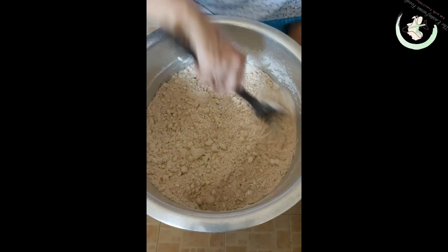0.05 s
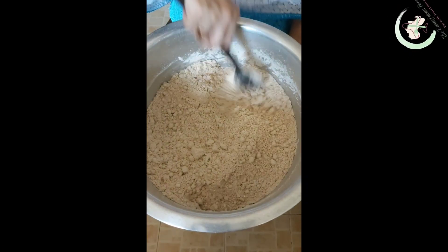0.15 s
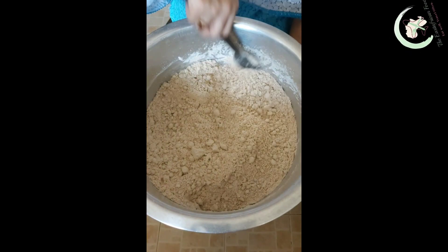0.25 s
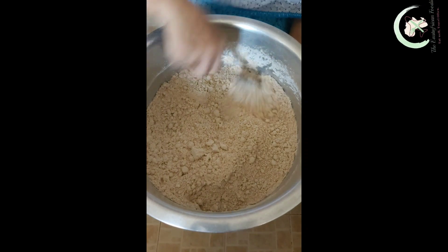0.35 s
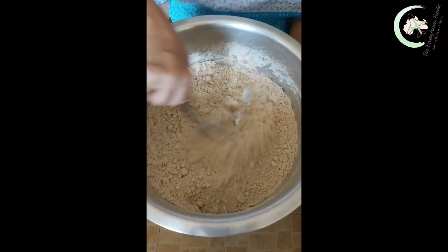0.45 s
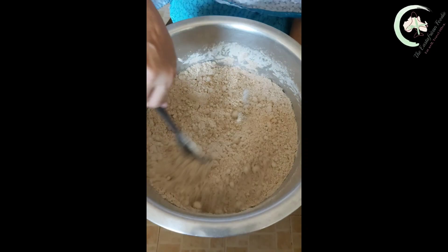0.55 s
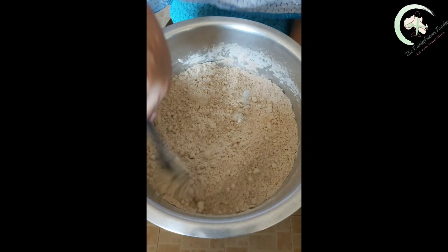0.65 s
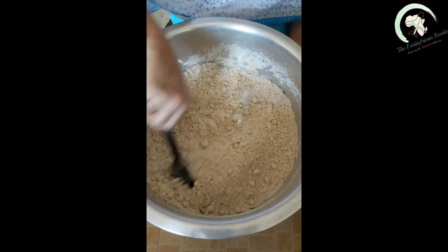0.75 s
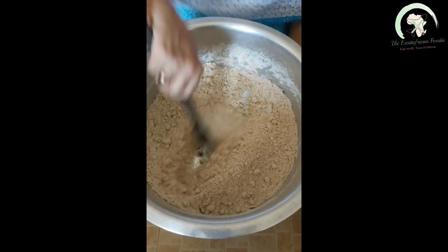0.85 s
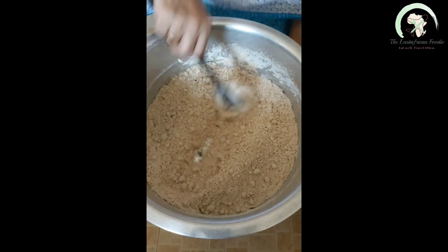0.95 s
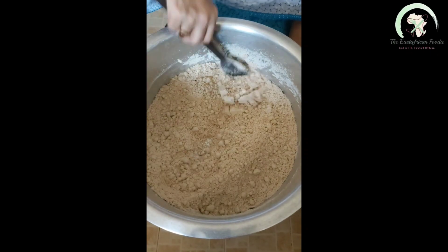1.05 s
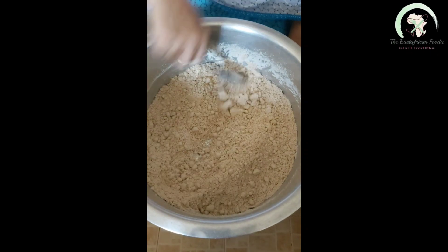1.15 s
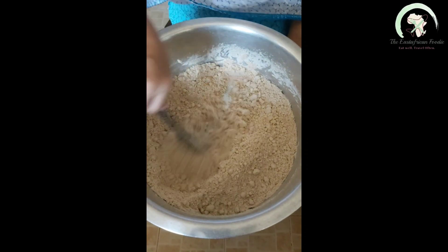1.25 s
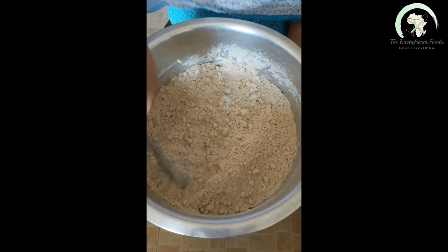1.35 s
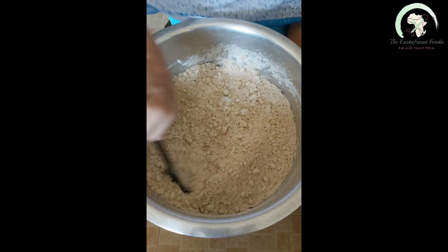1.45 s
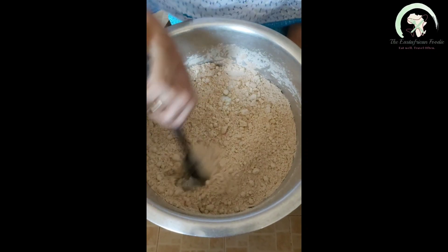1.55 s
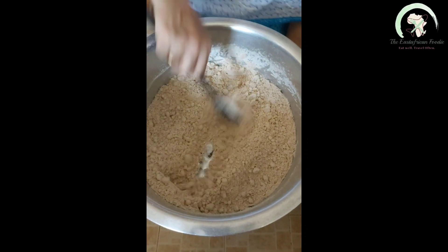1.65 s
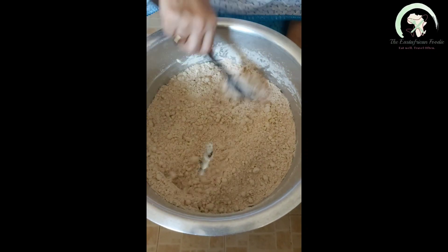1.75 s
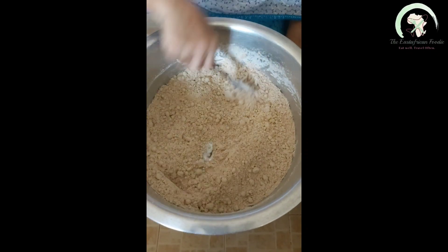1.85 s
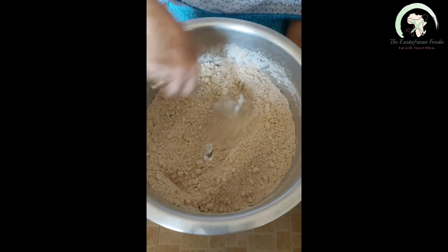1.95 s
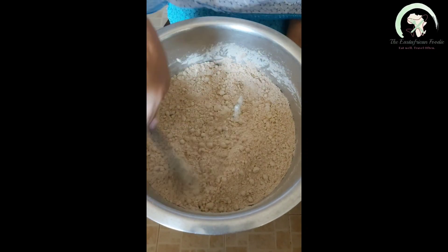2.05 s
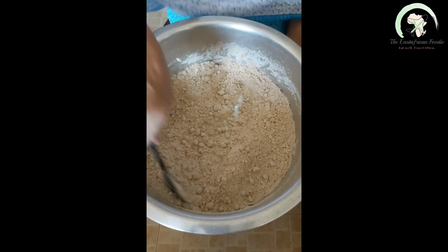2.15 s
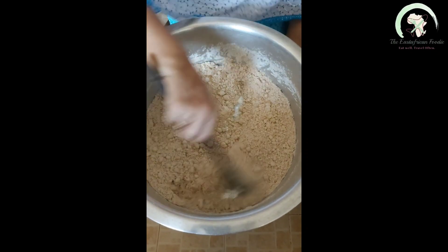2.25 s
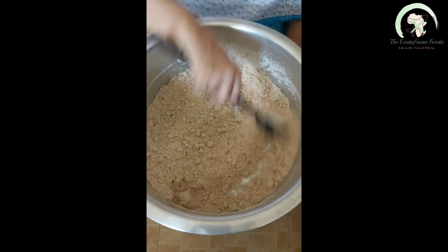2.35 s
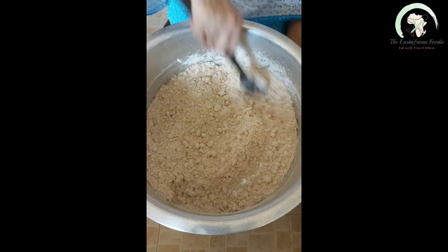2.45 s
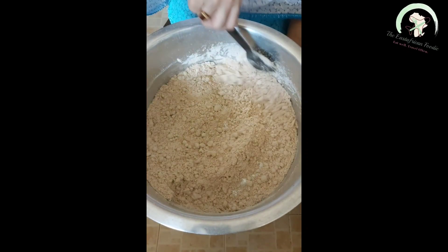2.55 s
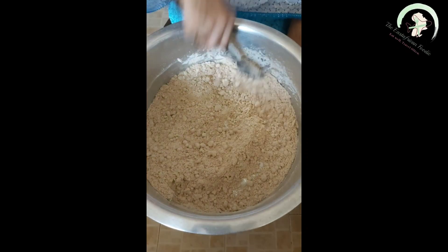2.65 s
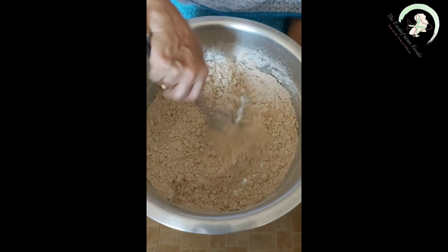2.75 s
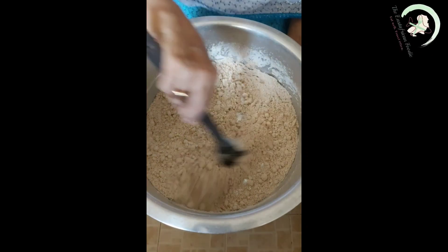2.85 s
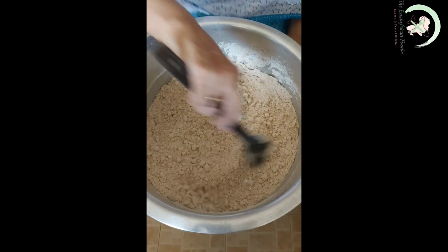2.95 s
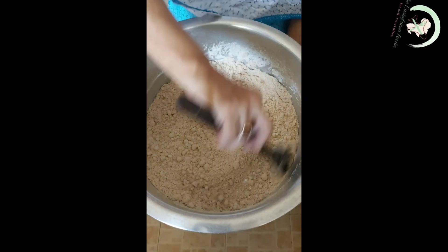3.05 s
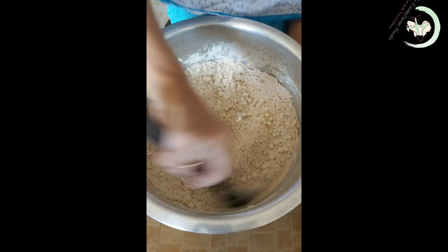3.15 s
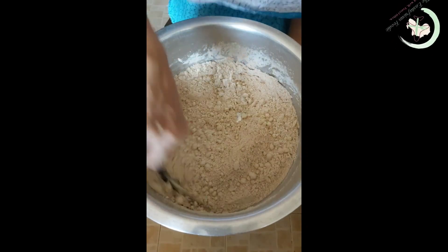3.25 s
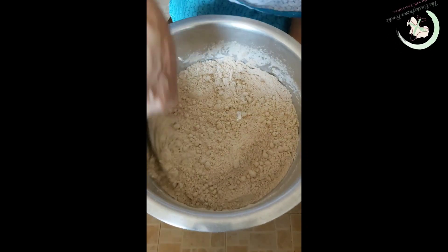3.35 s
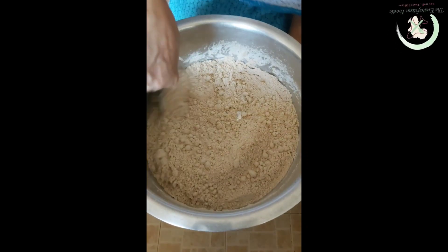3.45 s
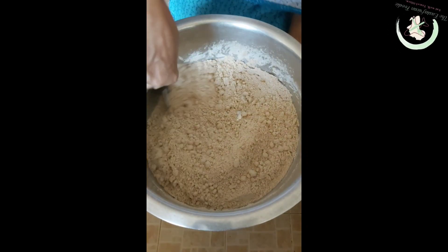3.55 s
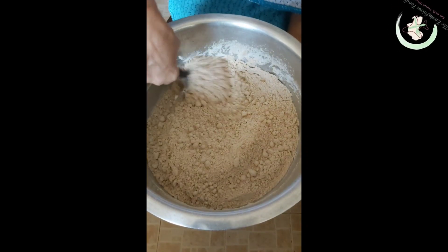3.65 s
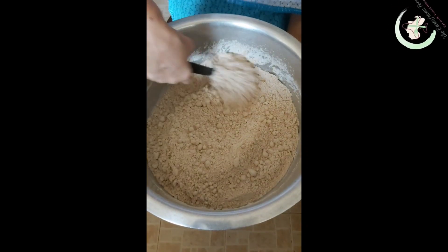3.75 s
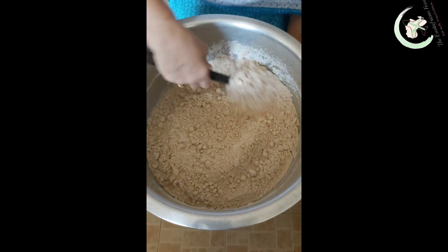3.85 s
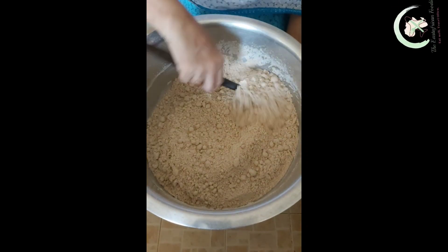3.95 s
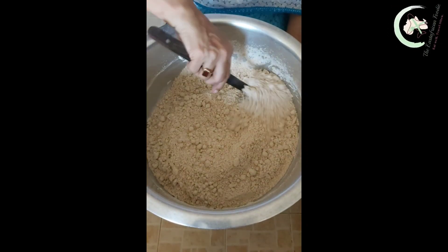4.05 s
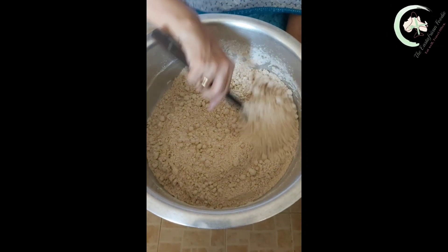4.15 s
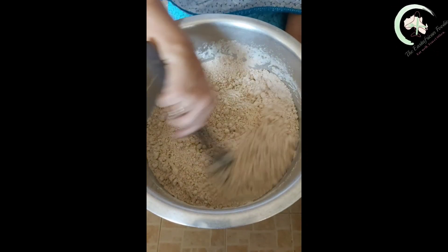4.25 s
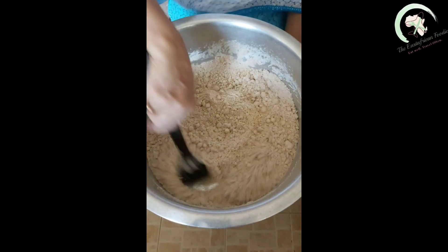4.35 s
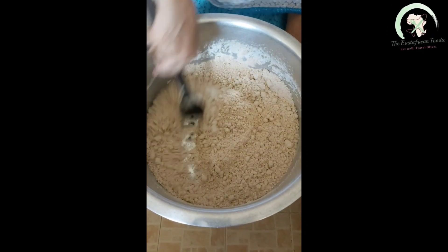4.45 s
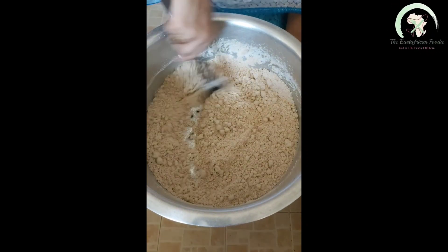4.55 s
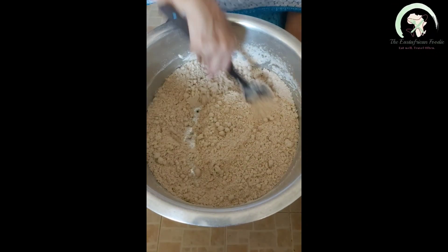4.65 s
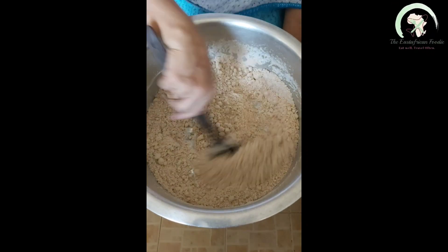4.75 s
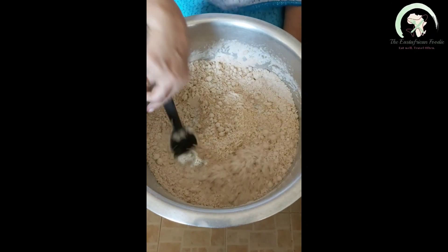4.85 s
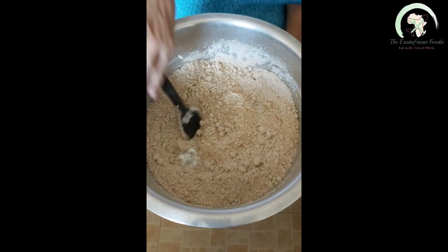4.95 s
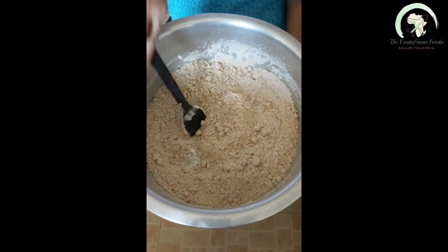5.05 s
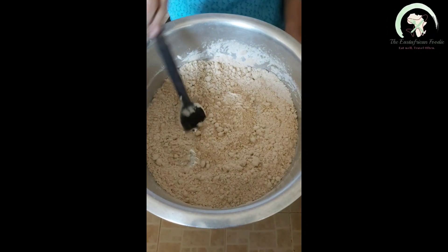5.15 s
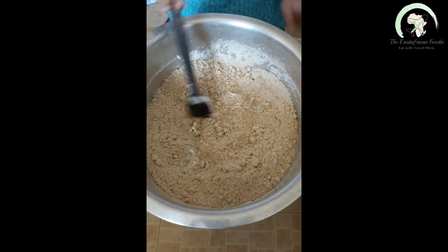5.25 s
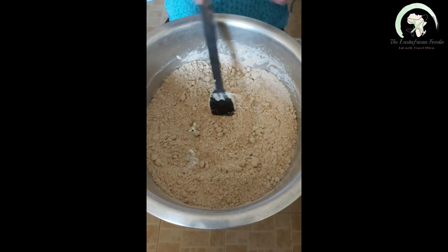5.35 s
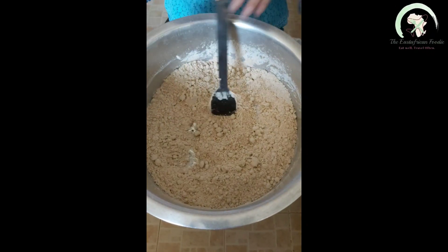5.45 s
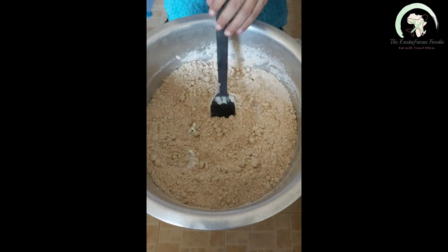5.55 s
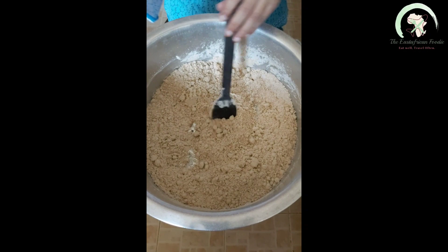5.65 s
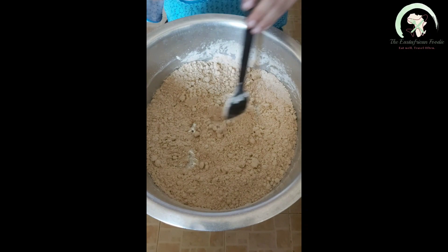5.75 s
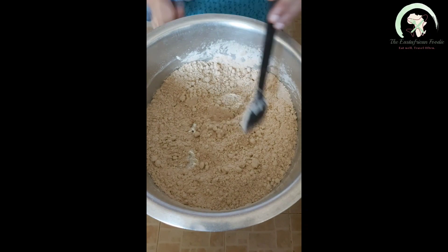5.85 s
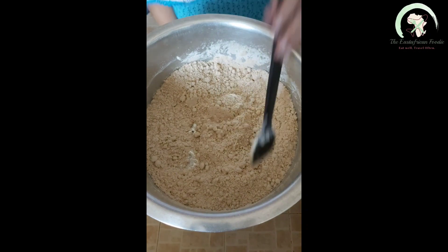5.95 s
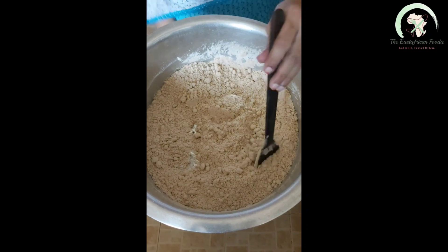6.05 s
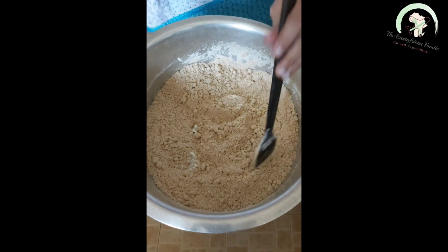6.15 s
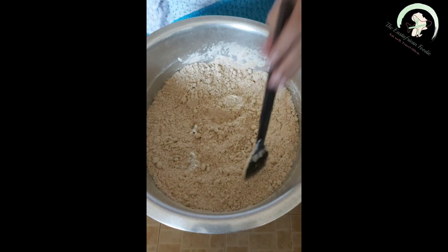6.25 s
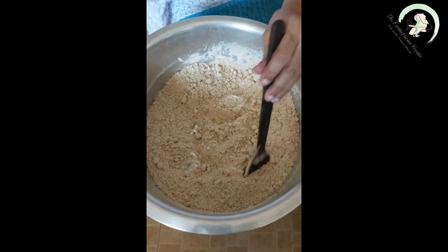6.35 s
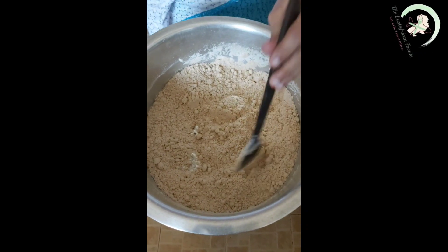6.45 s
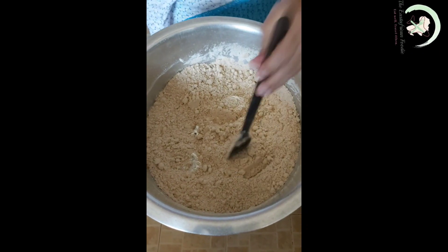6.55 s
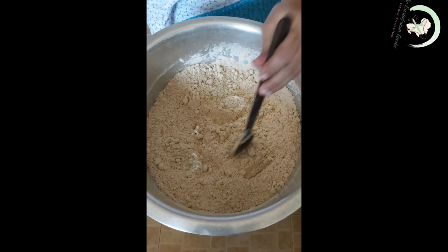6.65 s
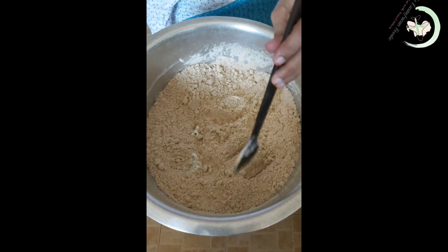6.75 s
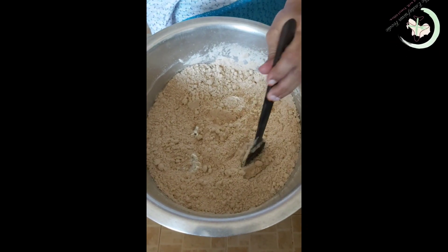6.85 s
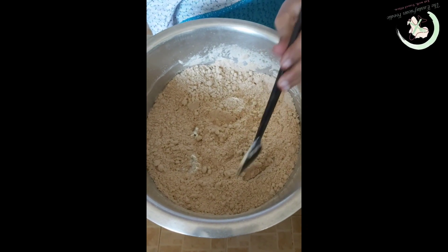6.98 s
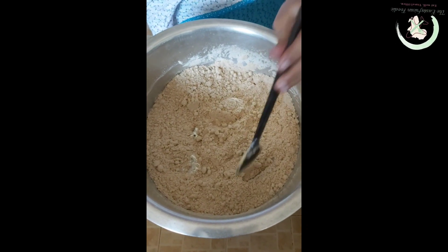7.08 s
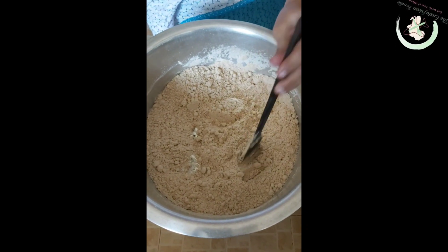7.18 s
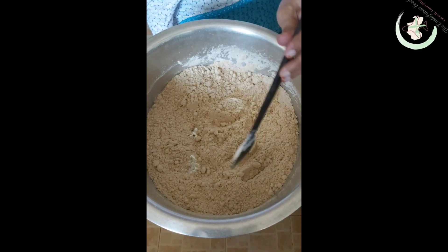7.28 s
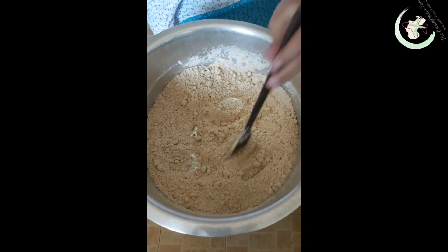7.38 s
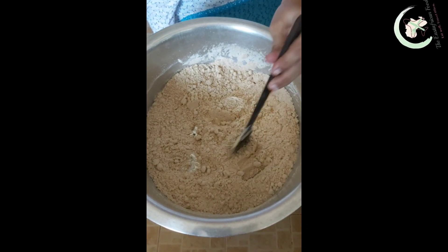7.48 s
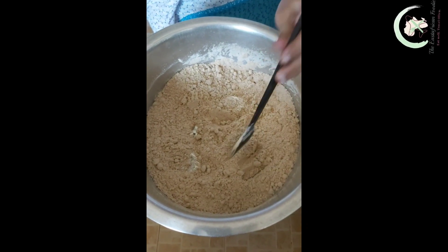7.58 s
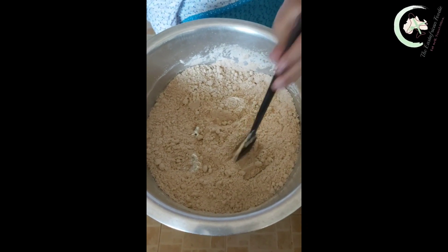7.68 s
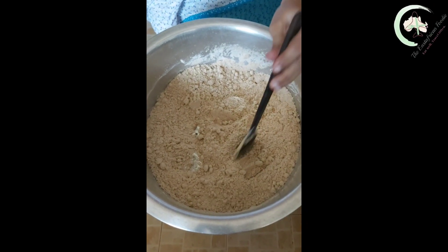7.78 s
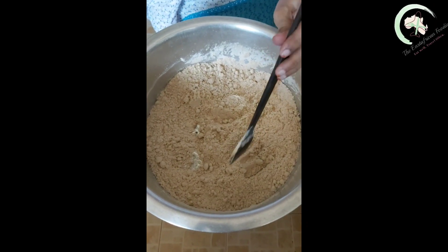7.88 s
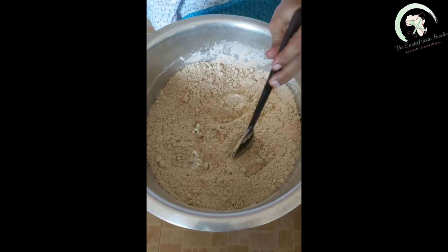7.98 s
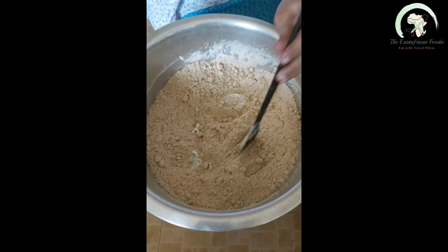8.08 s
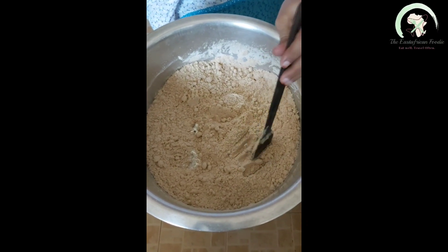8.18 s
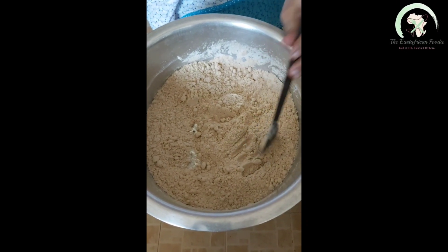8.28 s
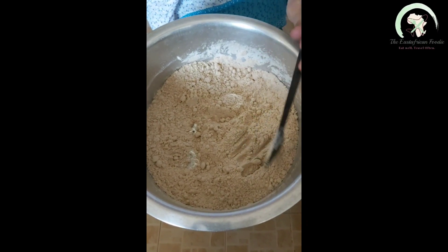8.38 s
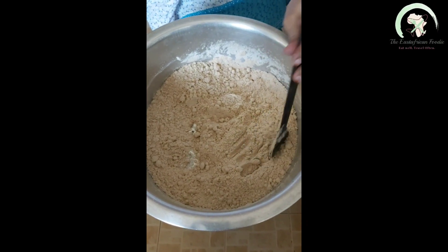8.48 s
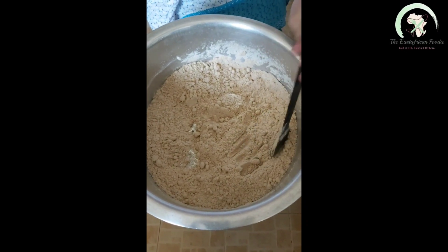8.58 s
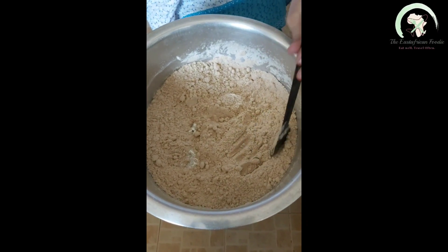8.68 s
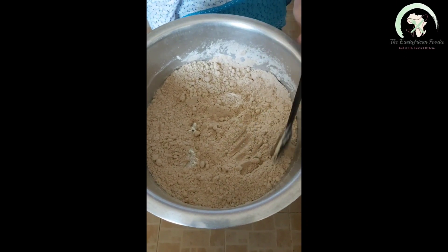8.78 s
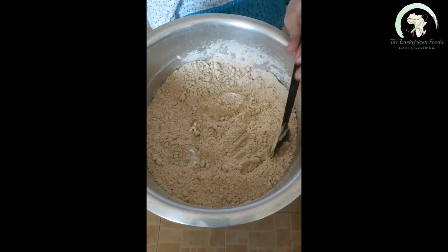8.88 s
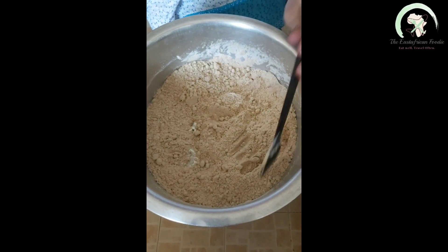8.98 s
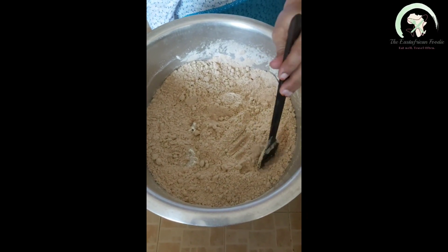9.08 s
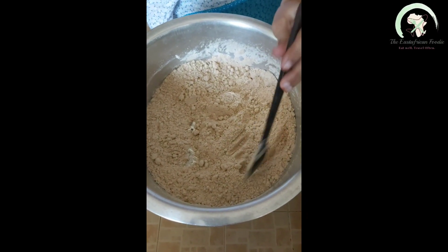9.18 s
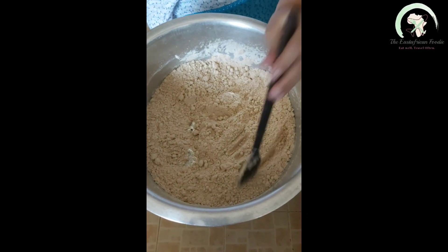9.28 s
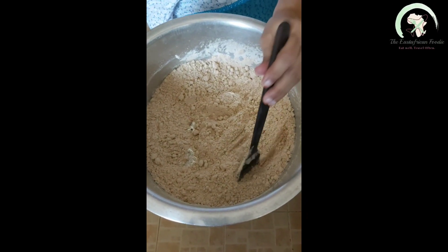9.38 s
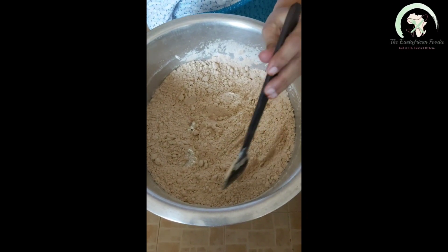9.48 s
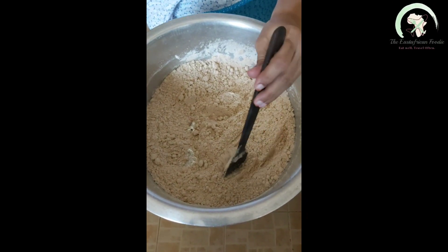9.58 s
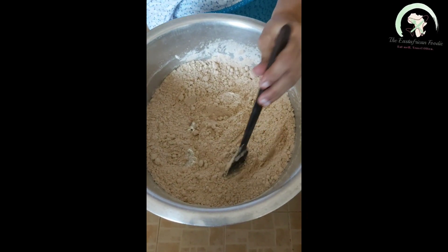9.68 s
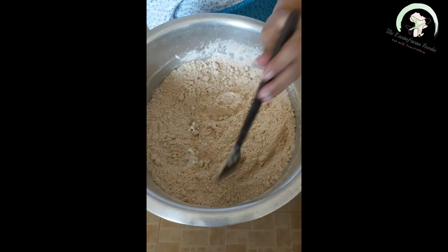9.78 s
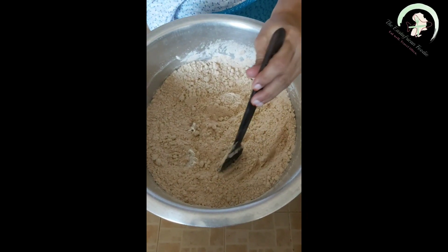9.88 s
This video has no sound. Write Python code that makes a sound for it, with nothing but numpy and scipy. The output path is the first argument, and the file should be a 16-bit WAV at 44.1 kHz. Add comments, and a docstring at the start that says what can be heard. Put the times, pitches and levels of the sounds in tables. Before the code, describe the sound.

A soft blade sweeps through dry flour in a metal bowl, each quick stroke mixing a low-mid bonk, a coarse rasp and a brief hiss. Clods drop with dry crunches and small bounces. The stirring ends in a busy burst of taps, almost stops for a second, then becomes regular muffled chops with a short gap near the end. Close microphone, short diffuse kitchen reflections, quiet rumble and distant bird calls.

```python
"""A plastic spatula stirs crumbly roasted flour in a wide steel bowl, then chops lumps with even downward strokes.
Knocks ring modes of the bowl and the space around it; stick-slip drag is gritty impulses through short rings.
Sliding powder is swelling filtered hiss; falling clods are noise bursts with a low bounce; two handle clinks ring the rim.
A small kitchen answers with a diffuse noise tail, over a low rumble, a thin hiss and faint gliding bird calls outside."""
import sys
import numpy as np
from scipy import signal
from scipy.fft import rfft, irfft
from scipy.io import wavfile
from scipy.ndimage import uniform_filter1d

SR = 44100
rng = np.random.default_rng(int(sys.argv[2]) if len(sys.argv) > 2 else 0)


def transcribe(signal):
    """Save signal, clipped to [-1, 1], as a 16-bit WAV file at the path in sys.argv[1]."""
    frames = np.atleast_2d(signal).T
    limited = np.clip(frames, -1, 1)
    pcm = np.round(limited * 32767).astype(np.int16)
    wavfile.write(sys.argv[1], SR, pcm)


N = 437472
TIME = np.arange(N) / SR
RING = np.arange(SR // 2) / SR  # half a second, the length of every ring and tail

# modes of the bowl and the space around it, before highpass and detuning:
# pitch_hz [Hz], level_db [relative dB], t60_s [s]
BODY_MODES = [(351.8, -0.5, 0.095), (234, -17.5, 0.17), (333.7, -7.5, 0.24), (372, -21.5, 0.57),
              (404.4, -10, 0.18), (429.8, -20, 0.3), (462.6, -23, 0.38), (584.5, -21.5, 0.11),
              (591.4, -27.5, 0.18), (668, -27.5, 0.3), (755.7, -23.5, 0.2), (771, -23.5, 0.12),
              (830, -36, 0.39), (1049, -40.5, 0.25), (1140, -52, .22), (1510, -35, 0.096)]
# the whole bowl bouncing on its support, before highpass: pitch_hz [Hz], level_db [relative dB], t60_s [s]
BOUNCE_MODES = [(48, -26, .3), (74.1, -1, 0.63), (107.5, 15, 0.064), (127.7, 1, 0.45), (172, 0, .08),
                (244.6, 1.5, 0.36)]
# flour slides under the blade, or trickles while it hovers:
# start_s at full flow [s], held_s [s], level_db of the flow [relative dB]
FLOUR_SLIDES = [(0.0, 0.018, -40.5), (0.3, 0.097, -35.5), (0.76, 0.044, -39), (1.08, 0.027, -39),
                (1.46, 0.066, -42), (1.85, .06, -38), (2.25, 0.04, -37), (2.69, 0.087, -37.5),
                (3.04, .64, -39.5), (3.74, 0.094, -42.5), (4.12, 0.095, -38.5), (4.42, 0.029, -37),
                (4.6, 0.15, -42), (5.0, 1.0, -57.5), (6.02, 0.17, -49.5), (6.26, 0.079, -46),
                (8.58, 0.12, -54.5), (9.03, 0.66, -56), (9.6, .32, -51)]
SLIDE_RISE_DB_S, SLIDE_FALL_DB_S = 157, 113


def amp(db):
    """Decibels to gain."""
    return 10 ** (np.asarray(db) / 20)


def unit(x):
    """Scale to rms 1."""
    return x / np.sqrt(np.mean(x ** 2))


def peak(x):
    """Scale to a peak of 1."""
    return x / np.abs(x).max()


def fade(t60):
    """Exponential decay over half a second, losing 60 dB in t60 seconds."""
    return np.exp(-np.log(1000) * RING / t60)


def colour(x, points):
    """Minimum-phase filter through (Hz, dB) points, so that no sound comes before its cause."""
    hz, db = np.transpose(points)
    size = 4096
    f = np.maximum(np.arange(size // 2 + 1) * SR / size, 1)
    log_gain = np.log(amp(np.interp(np.log(f), np.log(hz), db)))
    # folding the cepstrum onto positive time gives the minimum phase
    cepstrum = irfft(log_gain)
    cepstrum[1:size // 2] *= 2
    cepstrum[size // 2 + 1:] = 0
    response = irfft(np.exp(rfft(cepstrum)))
    return signal.fftconvolve(x, response[None], axes=1)[:, :x.shape[1]]


def ports(size, likeness):
    """Two channels of noise, partly shared: likeness 0 is wide, 1 is mono."""
    c = np.clip(likeness, 0, 1)
    shared = np.sqrt(c) * rng.standard_normal(size)
    return shared + np.sqrt(1 - c) * rng.standard_normal((2, size))


def walk(rate):
    """Slow smooth random motion of rms 1, with about `rate` new values a second."""
    k = int(SR / rate)
    values = rng.standard_normal(N // k + 2)
    path = np.interp(np.arange(N) / k, np.arange(N // k + 2), values)
    return unit(uniform_filter1d(path, k))


def grains(rate, spread_db):
    """Random tiny impulses of unequal size, about `rate` a second, scaled to rms 1."""
    hits = rng.random(N) < rate / SR
    signs = rng.choice([-1, 1], N)
    sizes = amp(spread_db * np.clip(rng.standard_normal(N), -2, 2))
    return unit(hits * signs * sizes)


def blows(times, db):
    """One impulse for each blow."""
    out = np.zeros(N)
    out[np.clip((times * SR).astype(int), 0, N - 1)] = amp(db)
    return out


def ring(force, response):
    """Drive a response with a force by convolution."""
    return signal.oaconvolve(np.atleast_2d(force), response, axes=1)[:, :N]


def modes(table, lag_s):
    """Sum of decaying sines; they reach the left channel lag_s later."""
    t = np.maximum(RING - np.array([[lag_s], [0]]), 0)
    return sum(amp(db) * fade(t60) * np.sin(2 * np.pi * hz * t) for hz, db, t60 in table)


def radiate(x, low_hz):
    """A highpass: little is sent out below low_hz."""
    return signal.sosfilt(signal.butter(3, low_hz, "high", fs=SR, output="sos"), x)


def press(x, contact_s):
    """A soft blade pushes for a while instead of striking at once, which rounds the attack."""
    t = RING[:SR // 200]
    push = t * np.exp(-t / contact_s)
    return signal.fftconvolve(x, push[None] / push.sum(), axes=1)[:, :x.shape[1]]


def swells(table, rise_db_s, fall_db_s, late_s=0):
    """Gain of a row of movements: each swells, holds and dies away at a steady rate in dB."""
    power = 0
    for start_s, held_s, level_db in table:
        age = TIME - start_s - late_s
        rise_db = rise_db_s * np.maximum(-age, 0)
        fall_db = fall_db_s * np.maximum(age - held_s, 0)
        power = power + amp(level_db - rise_db - fall_db) ** 2
    return np.sqrt(power)


def knocks(shapes):
    """Each blow lands on a new spot and mixes the modes anew; thin flour lets overtones and upper ring through."""
    # blade meets the bowl: start_s [s], body_db of the body note [relative dB],
    # bright_db of the upper ring against the body note [relative dB]
    knock_hits = [(0.264, -11, -21), (0.372, -9, -19), (0.424, -12.5, -29), (0.499, -19.5, -10.5),
                  (0.619, -19.5, -15), (0.77, -9, -31), (1.139, -4, -13), (1.151, -5, -21),
                  (1.499, -15.5, -22), (1.788, -6, -24), (1.861, -6.5, -11.5), (1.891, -9, -10),
                  (2.047, -20.5, -13), (2.191, -11, -18.5), (2.644, -12, -45), (2.735, -8.5, -31),
                  (2.779, -10.5, -40), (3.665, -17.5, -4), (3.731, -16.5, -8), (4.106, -9.5, -33),
                  (4.146, -10.5, -34), (4.178, -4.5, -17.5), (4.409, -10, -21), (4.422, -9.5, -21),
                  (4.456, -14, -22), (4.479, -6, -16), (4.491, -4.5, -17), (4.523, -5, -19.5),
                  (4.549, -6.5, -10.5), (4.675, -9.5, -8.5), (4.708, -2, -23), (4.859, -16, -40),
                  (5.994, -7, -30), (6.265, -1, -21), (6.541, -2.5, -28), (6.811, -0.5, -28),
                  (7.075, -2, -27), (7.353, -3.5, -27.5), (7.646, -3, -24.5), (7.906, -2, -16.5),
                  (8.129, -1.5, -24.5), (8.57, -14, -26), (9.039, -17.5, -40), (9.299, -2.5, -33.5),
                  (9.552, -5, -27.5), (9.816, -1.5, -31)]
    # colour of the upper sheet ring: pitch_hz [Hz], level_db [relative dB]
    sheet_colour = [(400, -6.5), (900, 7.5), (1400, -2), (2000, -2), (2700, -12), (3300, -19.5),
                    (5000, -20.5), (8000, -28.5), (16000, -28)]
    # overtones: a base level [dB], rising with the blow's brightness and its force [dB per dB]
    overtone_db, overtone_share, overtone_force = 6, 0.34, 0.28

    is_low = np.array(BODY_MODES)[:, 0] < 520
    low_peak = np.abs(shapes[is_low].sum(0)).max()
    over_peak = np.abs(shapes[~is_low].sum(0)).max()
    spot_db = 2.0 * rng.standard_normal((len(knock_hits), len(BODY_MODES)))
    # the first mode, the floor of the bowl moving as a whole, answers alike everywhere
    spot_db[:, 0] = 0
    # shifting flour loads the steel differently each time and detunes it a little
    tunings = 1 + .016 * rng.standard_normal(len(knock_hits))
    body = np.zeros((2, N + len(RING)))
    for (start_s, body_db, bright_db), spot, tuning in zip(knock_hits, spot_db, tunings):
        over_db = overtone_db + overtone_share * bright_db + overtone_force * body_db
        balance = np.where(is_low, amp(4.5) / low_peak, amp(over_db) / over_peak)
        gains = amp(body_db + spot) * balance
        mix = np.tensordot(gains, shapes, axes=1)
        start = int(start_s * SR)
        # reading the ring faster or slower shifts its pitch
        body[:, start:start + len(RING)] += [np.interp(RING * tuning, RING, port) for port in mix]

    start_s, body_db, bright_db = np.transpose(knock_hits)
    # dense upper ring: noise with a quick drop, a weak tail and a soft onset
    decay = fade(0.012) + amp(-19.5) * fade(0.2)
    sheet = ports(len(RING), likeness=0.96) * decay * (1 - np.exp(-RING / 0.00083))
    upper = ring(blows(start_s, body_db + bright_db + 8.5), peak(colour(sheet, sheet_colour)))
    return press(body[:, :N], contact_s=0.00028) + upper


def grating(count=4):
    """Quick slips on several gritty spots of the steel, each with its own short noise ring."""
    # colour of the grating: pitch_hz [Hz], level_db [relative dB]
    scrape_colour = [(150, -22), (330, 3), (500, 4.5), (700, 7.5), (900, -1.5), (1100, 1), (1500, -2),
                     (1950, -16), (2800, -12), (3600, -27.5), (4800, -22.5), (6800, -33), (12000, -35)]
    spots = 0
    for _ in range(count):
        slips = grains(rate=170, spread_db=6.0)
        spots = spots + ring(slips, ports(len(RING), likeness=0.73) * fade(0.02))
    return unit(colour(spots, scrape_colour))


def scraping(body):
    """The blade sticks and slips: quick slips grate on the steel, slower ones shake the bowl's body."""
    # the edge drags on the steel: start_s at full pressure [s], held_s [s], level_db of the grating [relative dB],
    # treble_db [relative dB], low where flour cushions the edge
    scrape_strokes = [(0.0, 0.003, -28, -2), (0.35, .014, -15, 1.5), (0.78, .05, -38, 1),
                      (1.141, 0.0071, -20.5, -3), (1.522, 0.022, -27.5, -3), (1.858, .02, -27.5, -6),
                      (2.299, 0.021, -24, 0.5), (2.704, 0.0052, -17, 3), (3.18, .42, -35, 0),
                      (3.664, 0.099, -20.5, -13.5), (4.111, 0.043, -29, 2), (4.49, 0.0074, -23, -20),
                      (4.568, .055, -20, 2.5), (4.66, 0.025, -31, 4)]
    rise_db_s, fall_db_s = 380, 304
    # judder against the grating and the sliding flour; the bowl goes on shaking after a slide
    judder_scrape_db, judder_slide_db, judder_fall_db_s = -9.5, 6, 42
    lag_s = 0.017  # the blade must bend before it starts to judder

    start_s, held_s, level_db, treble_db = np.transpose(scrape_strokes)
    pressure = swells(zip(start_s, held_s, level_db), rise_db_s, fall_db_s)
    bite = swells(zip(start_s, held_s, level_db + treble_db), rise_db_s, fall_db_s)
    bend = swells(zip(start_s, held_s, level_db), rise_db_s, fall_db_s, lag_s)
    drag = swells(FLOUR_SLIDES, SLIDE_RISE_DB_S, judder_fall_db_s, lag_s)
    # grit grates faintly whenever flour slides
    grit = amp(-4.5) * drag
    dull = colour(grating(), [(1650, -1), (2300, -24.5)]) * np.hypot(pressure, grit)
    sharp = colour(grating(), [(1400, -21), (2000, 0.5)]) * np.hypot(bite, grit)
    grate = (dull + sharp) * amp(1.95 * walk(70))
    judder_gain = np.hypot(amp(judder_scrape_db) * bend, amp(judder_slide_db) * drag)
    judder = grains(rate=150, spread_db=1.0) * judder_gain
    # the blade resting on the steel damps the body and rocks the bowl on its support
    rocking = radiate(modes(BOUNCE_MODES, lag_s=.00003), low_hz=55)
    held = body * fade(0.36) + amp(-20.5) * rocking
    return grate + ring(judder, held / np.sqrt(np.sum(held ** 2) / 2))


def powder():
    """Sliding flour: a fine hiss of countless grains, its fine and coarse parts swelling separately."""
    # colour of the hiss: pitch_hz [Hz], level_db [relative dB]
    powder_colour = [(180, -38), (300, -2), (405, -8), (486, -6.5), (584, -9), (656, -18.5), (814, -23),
                     (1150, -33), (1580, -22), (1810, -18), (3350, -25.5), (4910, -24.5), (6850, -26.5),
                     (11900, -26.5), (16000, -31.5)]
    settling_db = -58.5  # loose flour keeps settling throughout; same relative scale as the slides
    slide = swells(FLOUR_SLIDES, SLIDE_RISE_DB_S, SLIDE_FALL_DB_S)
    flow = np.hypot(slide, amp(settling_db)) * amp(1.4 * walk(32))
    fine = colour(ports(N, likeness=0.051), [(4000, -18.5), (8000, 0.5)]) * amp(1.4 * walk(9.9))
    coarse = colour(ports(N, likeness=0.096), [(5000, 0.5), (9000, -11)]) * amp(0.85 * walk(18))
    return amp(4.0) * flow * unit(colour(fine + coarse, powder_colour))


def clods():
    """Each clod bursts with a dry crunch, sheds crumbs and bounces the bowl, more softly on every hop."""
    # clods land on the heap and tumble on in even hops: start_s [s], crunch_db [relative dB],
    # landings [count], gap_s between landings [s]
    clod_falls = [(0.398, -14.5, 3, .069), (0.714, -26.5, 1, 0), (0.7879, -24.5, 2, .02),
                  (0.861, -25.5, 1, 0), (1.0066, -27, 1, 0), (1.0439, -25.5, 1, 0), (1.4524, -26.5, 1, 0),
                  (1.5183, -25.5, 1, 0), (1.9148, -15.5, 1, 0), (2.7572, -15, 1, 0), (2.8845, -26, 2, .044),
                  (6.0339, -21.5, 5, .0422), (6.325, -21, 3, .044), (6.8502, -33, 1, 0),
                  (7.1123, -36.5, 1, 0), (8.4093, -38.5, 1, 0), (8.6292, -20.5, 3, .0493),
                  (8.8278, -25.5, 2, .049), (9.0774, -29, 2, .0474), (9.3382, -29.5, 2, .0985),
                  (9.5893, -29.5, 1, 0)]
    # colour of the crunch: pitch_hz [Hz], level_db [relative dB]
    crunch_colour = [(110, -2.5), (380, 18.5), (520, 3), (700, 8), (1200, -2), (2600, -6), (3400, -15.5),
                     (4700, -11.5), (6500, -26), (8500, -17), (16000, -39)]
    hop_loss_db = 8  # lost on the first hop; later hops lose less
    thud_db, thud_slope = -0.5, 0.85  # the bounce grows with the crunch [dB, dB per dB]

    landings = []
    for start_s, level_db, count, gap_s in clod_falls:
        for hop in range(round(count)):
            landings.append((start_s + hop * gap_s, level_db - hop_loss_db * np.sqrt(hop)))
    land_s, crunch_db = np.transpose(landings)
    # the crunch itself, then the weaker shed of crumbs
    burst = fade(.007) + amp(-17) * fade(.09)
    envelope = ring(blows(land_s, crunch_db + 16.0), burst[None])
    crunch = colour(envelope * ports(N, likeness=0.38), crunch_colour)
    thud = radiate(modes(BOUNCE_MODES, lag_s=.00003), low_hz=60.6)
    return crunch + ring(blows(land_s, thud_db + thud_slope * crunch_db), peak(thud))


def clinks():
    """The bare rim clanks and rings; a handle that stays on it damps it, a softer touch leaves the low modes."""
    # modes of the bare rim, before filter and damping: pitch_hz [Hz], level_db [relative dB], t60_s [s]
    rim_modes = [(565, -22, .25), (829, 2, .45), (846, -2, .2), (964, -14, .3), (1058, -6, .4),
                 (1590, -8, .16), (1940, -16, .4), (2062, -14, .3), (2662, 0, .27), (3000, -14, .25),
                 (3402, -16, .3), (3820, -5, .28), (4111, -6, .26), (5028, -7, .19), (5399, -14, .25),
                 (7714, -18, .2)]
    # handle hits the rim: start_s [s], level_db [relative dB], ring_hz cut-off [Hz], clank_hz cut-off [Hz],
    # damping_s, t60 of the handle's added damping [s]
    clink_hits = [(0.158, -17.5, 5000, 9200, 0.93), (2.492, -23, 970, 3960, 0.48)]
    out = 0
    for start_s, level_db, ring_hz, clank_hz, damping_s in clink_hits:
        # the high modes of the rim lie too close to be heard one by one, so they are noise
        clank = ports(len(RING), likeness=0.16) * (amp(9.5) * fade(0.013) + amp(-1.5) * fade(0.32))
        clank = colour(clank, [(300, -8), (900, 10.5), (1700, -2), (2600, 2), (5500, 3), (9000, -4.5)])
        clank = colour(clank, [(clank_hz, 0), (clank_hz * 2, -16)])
        tones = modes(rim_modes, lag_s=.0001)
        tones = colour(tones, [(200, -20), (700, -4), (ring_hz, 2), (ring_hz * 4, -18)])
        out = out + ring(blows(np.array([start_s]), level_db), (tones + clank) * fade(damping_s))
    return out


def kitchen(dry):
    """Nearby walls return a short diffuse tail, different in each channel."""
    room_t60_s = 0.38
    onset = np.clip((RING - .004) / 0.0084, 0, 1)  # silent for 4 ms, then swells
    tail = ports(len(RING), likeness=0.099) * fade(room_t60_s) * onset
    tail /= np.sqrt(np.sum(tail ** 2) / 2)
    return ring(dry, colour(tail, [(80, -23.5), (330, -12.5), (600, -7), (1500, -5.5), (4000, -3.5), (12000, -16)]))


def birds():
    """Thin, distant calls: gliding sines blurred by the walls outside, as low noise multiplying each tone."""
    # bird calls: start_s [s], length_s [s], start_hz [Hz], end_hz [Hz], level_db [relative dB]
    bird_calls = [(0.048, 0.12, 3800, 3850, -45), (3.846, 0.15, 3830, 3600, -46),
                  (5.436, 0.2, 3650, 3870, -55), (5.856, 0.17, 4160, 3640, -54),
                  (6.444, 0.74, 1980, 1763, -55.5), (7.296, 0.18, 3750, 3890, -57.5),
                  (7.487, 0.16, 4280, 4370, -61), (8.268, 0.21, 4040, 4130, -55.5),
                  (8.425, 0.26, 8460, 9800, -60), (9.067, 0.19, 3900, 3770, -58),
                  (9.649, 0.36, 1914, 2090, -46), (9.777, 0.19, 3890, 4200, -49.5)]
    out = np.zeros((2, N))
    for start_s, length_s, start_hz, end_hz, level_db in bird_calls:
        i = np.arange(int(start_s * SR), min(int((start_s + length_s) * SR), N))
        u = (i / SR - start_s) / length_s  # 0 to 1 through the call
        blur = colour(ports(len(i), likeness=0.1), [(130, -7), (450, -14), (1200, -29), (3000, -80)])
        pitch_hz = start_hz + u * (end_hz - start_hz)
        tone = np.sin(2 * np.pi * np.cumsum(pitch_hz) / SR)
        out[:, i] += 2 * amp(level_db) * np.sin(np.pi * u) * unit(blur) * tone
    return out


def background():
    """A wavering low rumble, alike in both channels, under a thin even hiss: two filtered noises."""
    # colour of the background: pitch_hz [Hz], level_db [relative dB]
    air_colour = [(24, -55), (40, -5), (75, -6.5), (124, -5.5), (163, -17.5), (209, 0.5), (269, -4.5),
                  (305, -3.5), (751, -30.5), (1900, -25), (2320, -27.5), (3830, -28.5), (16000, -44)]
    rumble = colour(ports(N, likeness=.9), [(330, 0), (900, -14), (3000, -35)]) * amp(1.6 * walk(6))
    hiss = colour(ports(N, likeness=0.045), [(150, -43.5), (700, 9.0), (3000, -6.5), (7000, -5.5), (16000, -13)])
    return amp(-40) * unit(radiate(colour(rumble + hiss, air_colour), low_hz=42))


def scene():
    """Everything at the bowl, the kitchen's answer and the world outside."""
    # the floor mode reaches both channels almost together; each other mode has its own delay on the left
    lags_s = np.r_[.00006, .0004 * rng.random(len(BODY_MODES) - 1)]
    shapes = np.array([radiate(modes([mode], lag_s), low_hz=333) for mode, lag_s in zip(BODY_MODES, lags_s)])
    near = knocks(shapes) + scraping(shapes.sum(0)) + powder() + clods() + clinks()
    balance_db = -0.9  # left against right
    sides = amp(np.array([[balance_db], [-balance_db]]) / 2)
    return (near + kitchen(near)) * sides + birds() + background()


def record(dry):
    """Clip the very highest peaks at full scale, then cut the top with a steep lowpass."""
    lowpass = signal.ellip(8, .2, 70, 16200, fs=SR, output="sos")  # ripple dB, stopband dB, edge Hz
    return signal.sosfilt(lowpass, np.clip(dry, -1, 1))


dry = scene()
out = record(dry)
transcribe(out)
```